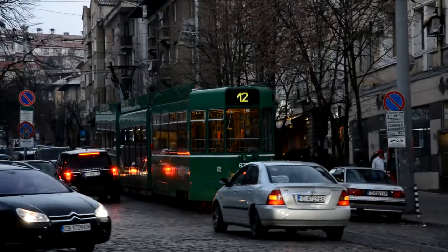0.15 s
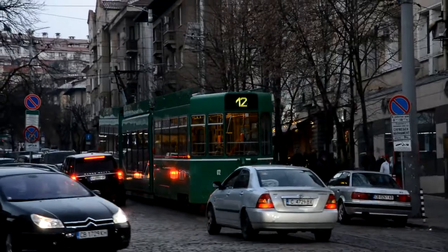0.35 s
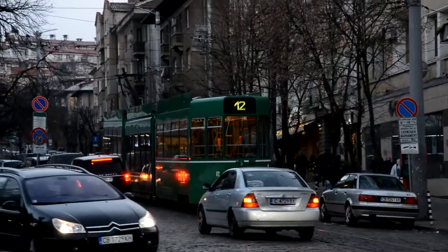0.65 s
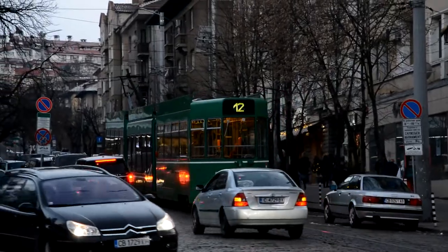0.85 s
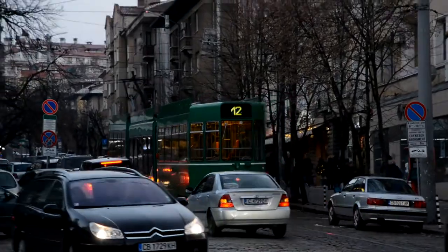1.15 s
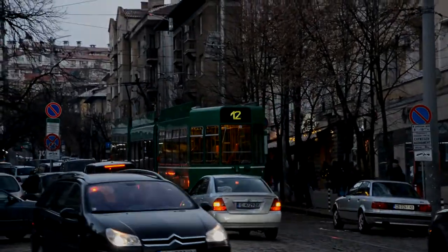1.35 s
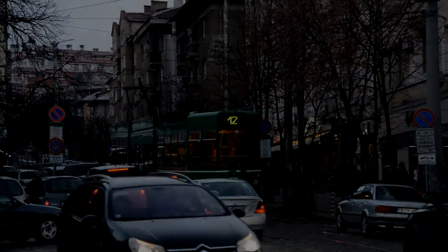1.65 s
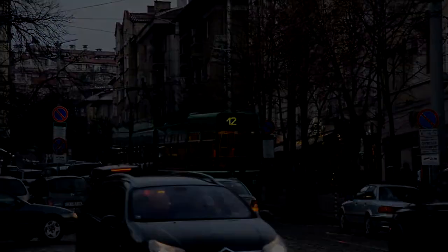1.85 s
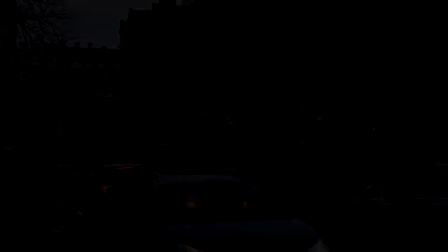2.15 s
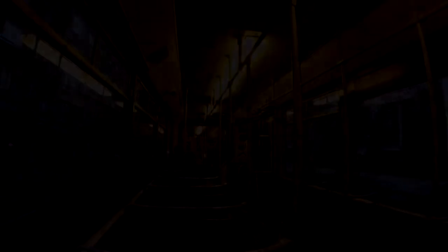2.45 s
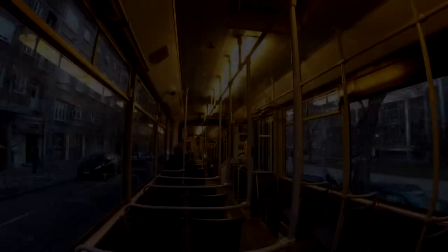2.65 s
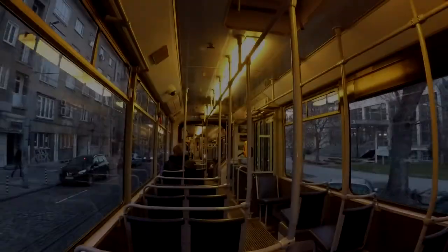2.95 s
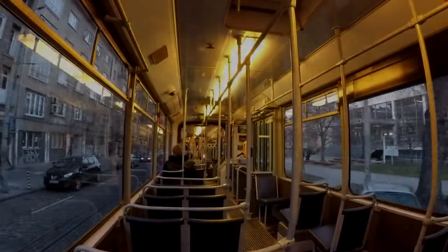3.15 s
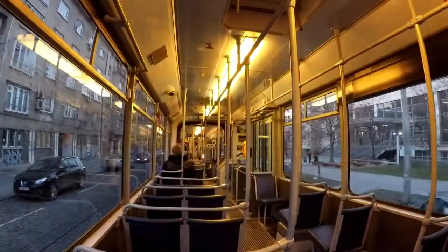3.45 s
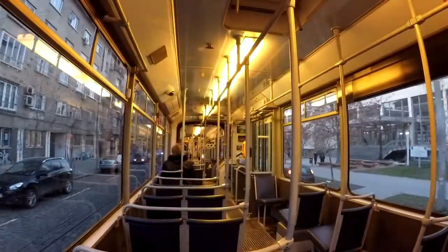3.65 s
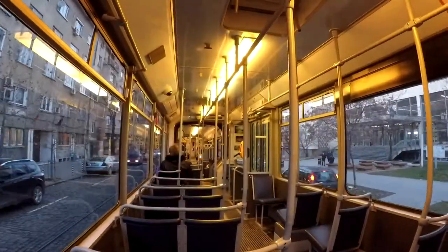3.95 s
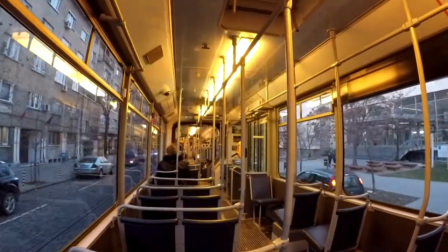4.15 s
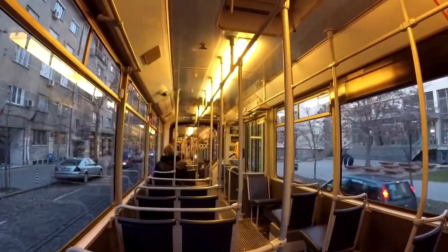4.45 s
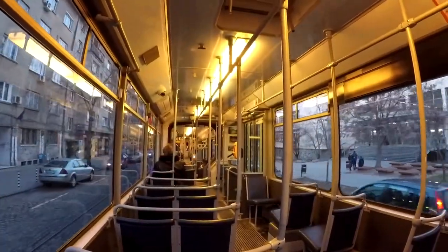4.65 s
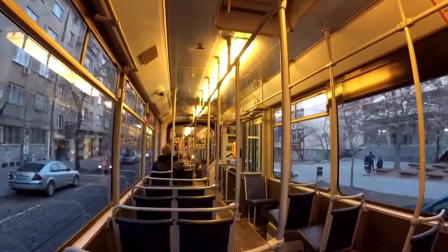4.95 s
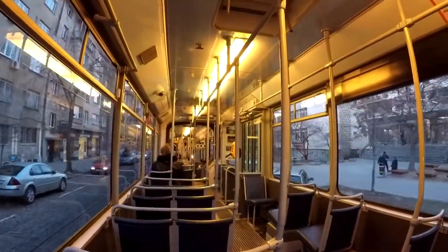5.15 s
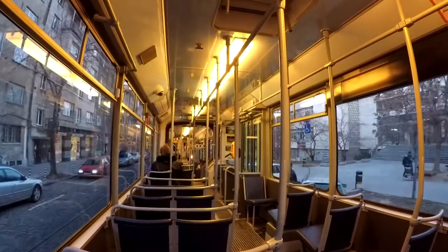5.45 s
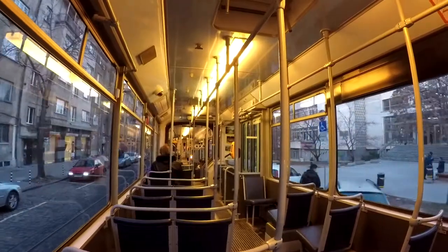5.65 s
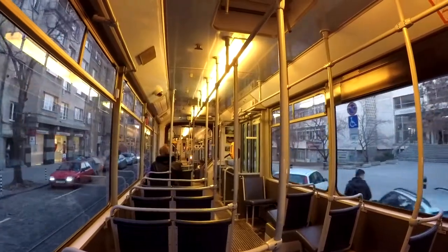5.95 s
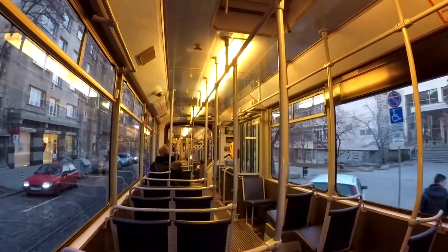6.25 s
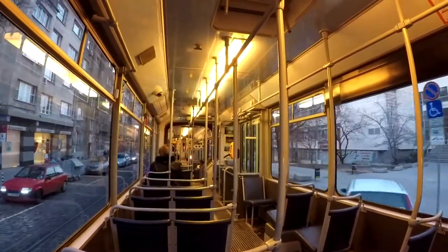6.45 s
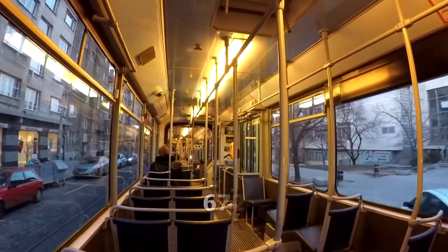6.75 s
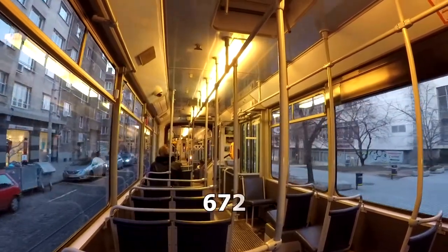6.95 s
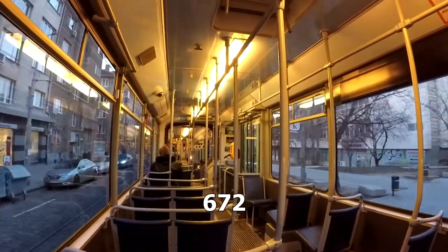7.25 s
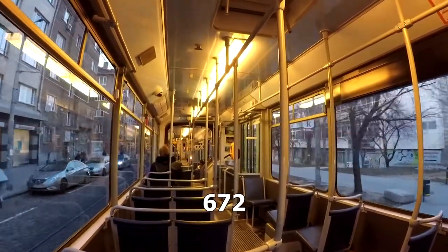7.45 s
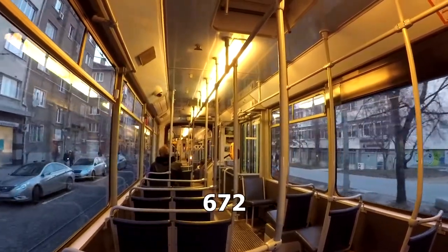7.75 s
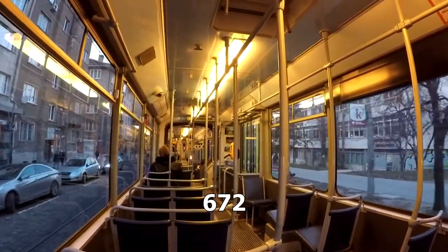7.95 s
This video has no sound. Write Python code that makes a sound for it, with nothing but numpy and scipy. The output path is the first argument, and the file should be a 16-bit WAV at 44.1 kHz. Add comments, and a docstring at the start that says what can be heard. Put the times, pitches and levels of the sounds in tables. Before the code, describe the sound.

Steady, uneven tyre and wheel roar outdoors, with a faint tram whine and hard little clicks, gradually yields to a much heavier ride heard from within a nearly empty tram. The floor rumbles deeply and wall panels drum; the drive hum climbs slightly, swelling and throbbing. Jolts knock the body, steel wheels rub and hiss in surges, and faint high electrical tones persist until the sound cuts off mid-ride.

```python
"""A tram whines through the roar of a cobbled street while a car drones away and sharp ticks sound.
The street then fades into a moving tram: shaped noise makes the floor rumble, the wheels hiss and rub on
the rails and the electrics sing high above, with thin sine tones in their hiss. The drive hums as a sine
of rising pitch that booms at cabin resonances. Deep noise surges as the body heaves, a wheel squeals
briefly as the street fades, and bumps ring the body as decaying sines with cracks of noise."""
import sys
import numpy as np
from scipy import signal
from scipy.fft import rfft, irfft, next_fast_len
from scipy.io import wavfile
from scipy.ndimage import uniform_filter1d, minimum_filter1d

SR = 44100
rng = np.random.default_rng(int(sys.argv[2]) if len(sys.argv) > 2 else 0)


def transcribe(u):
    """Save the signal u as a 16-bit wav file named by the first command-line argument.

    u: samples, shape (n,) or (channels, n), limited to [-1, 1]; the rate is SR.
    q: integer samples, one column per channel.
    """
    v = np.clip(np.atleast_2d(u).T, -1, 1)
    q = np.round(v * 32767).astype(np.int16)
    wavfile.write(sys.argv[1], SR, q)


N = 357651
T = np.arange(N) / SR  # time [s]

# Spectrum of the street roar: (frequency [Hz], relative density [dB per Hz])
STREET_SPECTRUM = [(45, -24.5), (73, -5.5), (120, -5), (150, -7.5), (190, 0), (290, -3.5), (420, -9),
                   (570, -6), (660, -3), (900, -3.5), (1350, -11), (2100, -15), (2600, -21), (4000, -24.5),
                   (4900, -32.5), (6300, -32), (10500, -45), (15500, -46.5)]
# Spectrum of the car's drone: (frequency [Hz], relative density [dB per Hz])
CAR_SPECTRUM = [(35, -31), (55, -14), (72, 1), (115, -16), (170, 1.5), (290, -3), (400, -12)]
# Ticks and clacks in the street, before its fade:
# (time [s], peak level [dB], nominal band frequency [Hz], burst decay time T60 [s])
STREET_TICKS = [(0.344, -36, 7000, .012), (.362, -16.5, 840, 0.036), (1.017, -18.5, 734, .07),
                (1.099, -31, 5500, .018), (1.170, -36, 9000, .012), (1.258, -33, 5500, .018),
                (1.329, -39, 9000, .012), (1.424, -39, 7500, .008), (1.457, -25, 2150, 0.033),
                (1.479, -38, 12000, .012), (1.558, -30.5, 5950, 0.013), (1.626, -35, 10000, .012),
                (1.962, -22, 1980, .035)]
# Spectrum of the floor rumble: (frequency [Hz], relative density [dB per Hz])
FLOOR_SPECTRUM = [(12, -7.5), (28, -1.5), (45, -2.5), (60, -0.5), (76, -2), (97, 0.5), (112, -5.5),
                  (140, -7.5), (175, -10), (215, -12.5), (260, -26.5), (330, -41), (600, -65)]
# Resonances of the wall panels: (frequency [Hz], half width at half amplitude [Hz], relative level [dB])
PANEL_RESONANCES = [(216, 10, -3.5), (279, 23, -4.5), (368, 38, -0.5), (438, 33, -6), (494, 31, -5.5),
                    (531, 31, -2.5)]
# Roughness of the track, before the floor and panel gains: (time [s], level [dB])
TRACK_ROUGHNESS = [(1.8, -20), (2.85, -18.5), (4.2, -14.5), (4.55, -16), (5.25, -15.5), (6.1, -15),
                   (6.8, -16.5), (7.3, -15), (8.1, -15.5)]
# Spectrum of the rolling wheels: (frequency [Hz], relative density [dB per Hz])
ROLL_SPECTRUM = [(300, -18), (550, -1), (800, -2.5), (1130, -9), (1400, -3.5), (1700, -10.5), (2200, -11),
                 (3100, -22.5), (6000, -40)]
# Spectrum of the flange rub: (frequency [Hz], relative density [dB per Hz])
RUB_SPECTRUM = [(900, -14), (1500, 1), (2400, 5), (3100, -0.5), (3900, 2), (4650, -1.5), (5200, -8.5),
                (7500, -17), (11000, -41.5)]
# Spectrum of the fine wheel hiss: (frequency [Hz], relative density [dB per Hz])
HISS_SPECTRUM = [(3500, -0.5), (5500, 5), (7100, 2.5), (7900, -2), (8600, -1), (9600, -6), (10500, -4.5),
                 (11700, -17.5), (13300, -17.5), (15000, -36.5)]
# Swells of flange contact, added in power to the steady levels:
# (start time [s], time to release [s], rub level [dB], hiss level [dB])
FLANGE_RUBS = [(4.48, 0.63, -44, -51.5), (5.303, 0.44, -43, -53.5), (5.787, 0.38, -39, -50.5),
               (6.8, .25, -45, -66), (7.226, 0.19, -42.5, -52), (7.47, 0.41, -43, -53.5)]
# Spectrum of the electrics' hiss: (frequency [Hz], relative density [dB per Hz])
SING_SPECTRUM = [(4500, -45.5), (5750, -19), (5970, -4), (6200, -5), (6500, -4.5), (6680, -15.5),
                 (6900, -17), (7100, -15.5), (7700, -36), (8500, -17.5), (9500, -29)]
# Thin tones of the electrics: (frequency [Hz], mean level relative to the hiss [dB])
SING_TONES = [(6054, -18.5), (6093, -19.5), (6169, -20), (6191, -8), (6346, -14), (6578, -21.5),
              (7082, -26.5), (8326, -30.5)]
# Singing of the electrics: (time [s], hiss level [dB])
SING_LEVELS = [(1.9, -59), (3.1, -51.5), (3.9, -51), (6.05, -46.5), (6.45, -50), (7.35, -48.5), (8.1, -51)]
# The drive gathers speed: (time [s], mean pitch [Hz])
DRIVE_PITCH = [(1.3, 175.6), (3.2, 179.7), (5.2, 186), (8.1, 194.4)]
# Cabin resonances that the drive tone climbs through:
# (frequency [Hz], half width at half amplitude [Hz], level [dB])
CABIN_RESONANCES = [(179.67, 1.85, -11.5), (182.7, 1, -16.5), (190.37, 1.48, -10.5), (193.2, 0.79, -13.5)]
# Spectrum of the heaving body: (frequency [Hz], relative density [dB per Hz])
HEAVE_SPECTRUM = [(22, -6), (38, 2), (65, -2.5), (85, -19)]
# The body heaves over dips in the track: (start time [s], time to release [s], level [dB])
BODY_HEAVES = [(1.548, 1.3, -23.5), (4.715, 0.5, -17), (5.5, 1.05, -18.5), (7.17, 0.26, -17.5)]
# Bumps of the body: (time [s], peak level [dB], crack level relative to the thud [dB])
BODY_BUMPS = [(2.361, -20, 2), (3.05, -17, -12), (3.267, -12.5, -1), (3.688, -22, -16), (4.172, -15.5, -18),
              (4.425, -14.5, -12), (4.501, -18.5, -14), (5.689, -20, -20), (6.07, -23, -12),
              (7.301, -18, -15), (7.569, -16.5, -20)]
# Modes rung by a bump, before detuning and onset: (frequency [Hz], relative level [dB], decay time T60 [s])
BODY_MODES = [(249, -3.5, 0.66), (339.6, 0.5, .17), (434.4, 3.5, 0.12), (545, -8.5, 0.13),
              (792, -10.5, .06), (1210, -18.5, .044)]
# Spectrum of the cracks in the fittings: (frequency [Hz], relative density [dB per Hz])
CRACK_SPECTRUM = [(330, 3.5), (850, 2), (1250, 5), (2600, -9.5), (5500, -18.5), (8000, -38)]

# The street fades out while the inside fades in
STREET_DB, STREET_FADE_S, STREET_GONE_S, STREET_FADE_POWER = -29, 1.23, 3.42, 0.39
INSIDE_START_S, INSIDE_FADE_S = 1.05, 0.82
# The tram's whine sags in pitch and dies away as it leaves
WHINE_HZ, WHINE_SAG_HZ_PER_S, WHINE_DB, WHINE_HOLD_S, WHINE_T60_S = 500, 12, -37, 1.4, 3.5
CAR_DB, CAR_HOLD_S, CAR_T60_S = -36, 0.32, 1.7
# Steady levels of the wheels, then the shape of the flange swells
ROLL_DB, RUB_DB, HISS_DB = -37.5, -45.5, -54
RUB_ATTACK_S, RUB_T60_S = 0.081, 0.95
DRIVE_ON_S, DRIVE_ATTACK_S = 1.2, 0.13
HUM_DB = -26  # drive tone between resonances
# A second motor runs slightly faster; its beat comes and goes
BEAT_HZ, BEAT_CREST_S, BEAT_DB = 3.44, 4.31, -24
BEAT_START_S, BEAT_LENGTH_S, BEAT_ATTACK_S, BEAT_T60_S = 3.63, 2, 1, 2.5
SQUEAL_S, SQUEAL_LENGTH_S, SQUEAL_HZ, SQUEAL_DB = 2.16, 0.23, 997, -32.5
TOP_HZ = 15700  # edge of the final low-pass


def undb(db):
    """Logarithmic level: decibels to amplitude gain."""
    return 10 ** (np.asarray(db) / 20)


def unit(x):
    """Normalization of mean power: scale to rms 1."""
    return x / np.sqrt(np.mean(x ** 2))


def curves(table):
    """Linear interpolation: each column of a table, joined by straight lines in time."""
    times, *columns = np.transpose(table)
    return [np.interp(T, times, column) for column in columns]


def walk(knots_per_s):
    """Slow random modulation: joined random knots, smoothed, with spread near 1."""
    knots = rng.standard_normal(2048)
    wander = np.interp(T * knots_per_s, np.arange(len(knots)), knots)
    return 1.3 * uniform_filter1d(wander, max(int(SR / knots_per_s / 2), 1))


def noise(gain_at):
    """Spectral shaping: noise of rms 1 filtered by a function of frequency."""
    size = next_fast_len(N)
    f = np.maximum(np.fft.rfftfreq(size, 1 / SR), 1)
    spectrum = rfft(rng.standard_normal(size)) * gain_at(f)
    return unit(irfft(spectrum, size)[:N])


def coloured(points):
    """Spectral density: noise through points on a log frequency axis, falling away beyond the ends."""
    hz, db = np.transpose(points)

    def gain_at(f):
        inside = undb(np.interp(np.log(f), np.log(hz), db))
        return inside * np.minimum(f / hz[0], 1) ** 2 * np.minimum(hz[-1] / f, 1) ** 2

    return noise(gain_at)


def band(x, low_hz, high_hz):
    """Band-pass filtering with fairly steep skirts."""
    edges = [low_hz, min(high_hz, SR / 2 - 1000)]
    return signal.sosfilt(signal.butter(3, edges, 'band', fs=SR, output='sos'), x)


def decay(t, t60):
    """Exponential damping: amplitude loses 60 dB in t60 seconds."""
    return np.exp(-np.log(1000) * t / t60)


def ramp(start_s, length_s):
    """Linear growth of amplitude from 0 to 1."""
    return np.clip((T - start_s) / max(length_s, 1 / SR), 0, 1)


def swell(start_s, length_s, attack_s, t60):
    """Driven then free response: linear attack, hold, exponential release."""
    return ramp(start_s, attack_s) * decay(np.maximum(T - start_s - length_s, 0), t60)


def tone(hz):
    """Frequency modulation: a sine whose phase accumulates a pitch curve."""
    return np.sin(2 * np.pi * np.cumsum(hz) / SR)


def add(out, s, sound, db):
    """Superposition: place a sound at a time with a given peak level."""
    i = int(s * SR)
    out[i:i + len(sound)] += (undb(db) * sound / np.abs(sound).max())[:N - i]


def street_roar(patter_db=0.62):
    """Broadband contact noise: wheels and tyres roar unevenly on the cobbles."""
    return coloured(STREET_SPECTRUM) * undb(STREET_DB + patter_db * walk(60))


def tram_whine(waver_db=3.0, blur=0.014):
    """Frequency and amplitude modulation: a sagging sine, blurred in pitch, wavers and dies away."""
    pitch = (WHINE_HZ - WHINE_SAG_HZ_PER_S * T) * (1 + blur * walk(60))
    whine = tone(pitch) * undb(WHINE_DB + waver_db * walk(22))
    return whine * decay(np.maximum(T - WHINE_HOLD_S, 0), WHINE_T60_S)


def car():
    """Attenuation with distance, as exponential decay: the low drone of a car drawing away."""
    return coloured(CAR_SPECTRUM) * undb(CAR_DB) * decay(np.maximum(T - CAR_HOLD_S, 0), CAR_T60_S)


def ticks():
    """Impulsive excitation: hard contacts on track and cobbles as decaying, band-passed noise bursts."""
    out, t = np.zeros(N), np.arange(SR // 10) / SR
    for s, db, hz, t60 in STREET_TICKS:
        burst = rng.standard_normal(len(t)) * decay(t, t60)
        add(out, s, band(burst, hz * 0.5, hz * 1.45), db)
    return out


def body(rumble_db=1, panel_db=-15.0, shake_db=1.5):
    """Forced vibration: rough track shakes the floor and drums the wall panels at their resonances."""
    track_db, = curves(TRACK_ROUGHNESS)
    floor = coloured(FLOOR_SPECTRUM)
    # the suspension evens out the shaking from moment to moment
    floor = floor / np.sqrt(uniform_filter1d(floor ** 2, SR // 10))
    panels = 0
    for hz, width, db in PANEL_RESONANCES:
        panels = panels + undb(db) * noise(lambda f: 1 / (1 + ((f - hz) / width) ** 2))
    panels = unit(panels) * undb(panel_db + shake_db * walk(28))
    return undb(track_db) * (floor * undb(rumble_db) + panels)


def wheels(roll_swell_db=-2, chatter_db=0.73, scrape_db=0.5):
    """Friction noise: steel rolls on steel; flanges rub in swells, with a fine hiss where they bite."""
    rub_power = hiss_power = 0
    for s, length, rub_db, hiss_db in FLANGE_RUBS:
        contact = swell(s, length, RUB_ATTACK_S, RUB_T60_S)
        rub_power = rub_power + (undb(rub_db) * contact) ** 2
        hiss_power = hiss_power + (undb(hiss_db) * contact) ** 2
    # independent noises add in power
    roll_gain = np.sqrt(undb(ROLL_DB) ** 2 + undb(roll_swell_db) ** 2 * rub_power)
    roll = coloured(ROLL_SPECTRUM) * roll_gain
    rub = coloured(RUB_SPECTRUM) * np.sqrt(undb(RUB_DB) ** 2 + rub_power)
    hiss = coloured(HISS_SPECTRUM) * np.sqrt(undb(HISS_DB) ** 2 + hiss_power)
    return roll * undb(chatter_db * walk(45)) + (rub + hiss) * undb(scrape_db * walk(60))


def electrics(waver_db=2.0, wander_rad=0.34):
    """Line spectrum on narrow-band noise: a high hiss holds thin tones of wavering level and phase."""
    level_db, = curves(SING_LEVELS)
    tones = 0
    for hz, tone_db in SING_TONES:
        gain = undb(tone_db + waver_db * walk(13))
        tones = tones + gain * np.sin(2 * np.pi * hz * T + wander_rad * walk(10))
    # root 2 gives each sine rms 1 before its gain
    return (coloured(SING_SPECTRUM) + np.sqrt(2) * tones) * undb(level_db)


def cabin_gain(hz):
    """Resonance: the cabin amplifies the drive tone near each of its own frequencies."""
    power = sum(undb(db) ** 2 / (1 + ((hz - centre) / width) ** 2) ** 2
                for centre, width, db in CABIN_RESONANCES)
    return np.sqrt(power + undb(HUM_DB) ** 2)


def drive(waver_db=0.5, flutter_db=-30, second_db=-40, third_db=-47, overtone_waver_db=2):
    """Resonance and beats: a rising tone booms, throbs against a second motor and has weak overtones."""
    hz, = curves(DRIVE_PITCH)
    phase = 2 * np.pi * np.cumsum(hz * (1 + 0.003 * walk(18))) / SR
    motor_gain = cabin_gain(hz) * undb(waver_db * walk(12)) + undb(flutter_db) * walk(24)
    motor = motor_gain * np.sin(phase)
    # the two motors are in phase at the crest
    other_motor = undb(BEAT_DB) * np.sin(phase + 2 * np.pi * BEAT_HZ * (T - BEAT_CREST_S))
    other_motor = other_motor * swell(BEAT_START_S, BEAT_LENGTH_S, BEAT_ATTACK_S, BEAT_T60_S)
    overtones = sum(undb(db + overtone_waver_db * walk(17)) * np.sin(k * phase)
                    for k, db in enumerate((second_db, third_db), 2))
    return np.sqrt(2) * (motor + other_motor + overtones) * ramp(DRIVE_ON_S, DRIVE_ATTACK_S)


def heaves(attack_s=0.093, t60=1.2):
    """Low-frequency oscillation: deep noise surges as the body rocks on its springs."""
    surges = sum(undb(db) * swell(s, length, attack_s, t60) for s, length, db in BODY_HEAVES)
    return coloured(HEAVE_SPECTRUM) * surges


def squeal(blur=0.003, waver_db=-2.0, attack_s=0.027, t60=0.25):
    """Frictional self-oscillation, as a wavering sine: a wheel squeals briefly on the rail."""
    pitch = SQUEAL_HZ * (1 + blur * walk(60))
    level = undb(SQUEAL_DB + waver_db * walk(31))
    return tone(pitch) * level * swell(SQUEAL_S, SQUEAL_LENGTH_S, attack_s, t60)


def bumps(crack_t60=0.044):
    """Modal excitation: each jolt cracks in the fittings and rings the body's low modes."""
    out, t = np.zeros(N), np.arange(SR // 3) / SR
    rattle = coloured(CRACK_SPECTRUM)
    for s, db, crack_db in BODY_BUMPS:
        detune = 1 + 0.033 * rng.standard_normal(len(BODY_MODES))
        thud = sum(undb(mode_db) * decay(t, t60) * np.sin(2 * np.pi * hz * d * t)
                   for (hz, mode_db, t60), d in zip(BODY_MODES, detune))
        # the heavy body takes a few milliseconds to get moving
        thud = thud * (1 - decay(t, 0.04))
        crack = rattle[int(s * SR):][:len(t)] * decay(t, crack_t60) * (1 - decay(t, 0.0017))
        jolt = thud / np.abs(thud).max() + undb(crack_db) * crack / np.abs(crack).max()
        add(out, s, jolt, db)
    return out


def scene():
    """Superposition under two fades: the street gives way to the ride."""
    outside = (1 - ramp(STREET_FADE_S, STREET_GONE_S - STREET_FADE_S)) ** STREET_FADE_POWER
    inside = ramp(INSIDE_START_S, INSIDE_FADE_S)
    street = street_roar() + tram_whine() + car() + ticks() + squeal()
    ride = body() + wheels() + electrics() + drive() + heaves() + bumps()
    return (outside * street + inside * ride)[None]


def record(dry, ceiling_db=-3.5):
    """Dynamic limiting and low-pass filtering: look-ahead gain holds the peaks down; the top is cut."""
    hold = SR // 50  # samples in 20 ms
    gain = np.minimum(1, undb(ceiling_db) / (np.abs(dry) + 1e-9))
    gain = uniform_filter1d(minimum_filter1d(gain, hold), hold)
    low_pass = signal.ellip(10, 0.2, 80, TOP_HZ, fs=SR, output="sos")
    return signal.sosfilt(low_pass, dry * gain)


dry = scene()
out = record(dry)
transcribe(out)
```